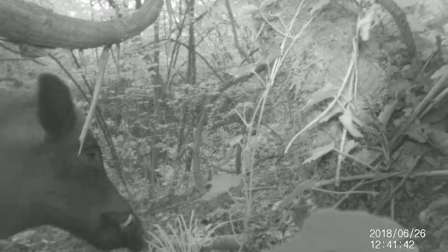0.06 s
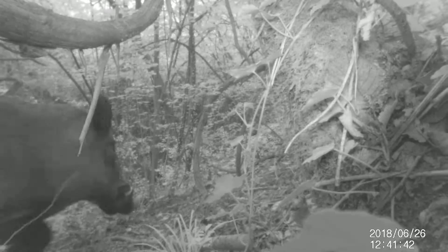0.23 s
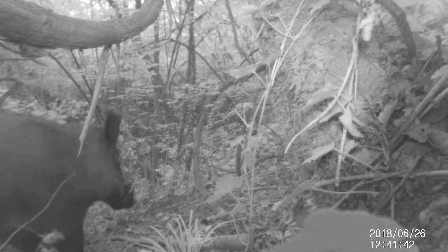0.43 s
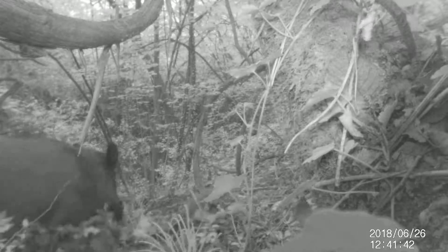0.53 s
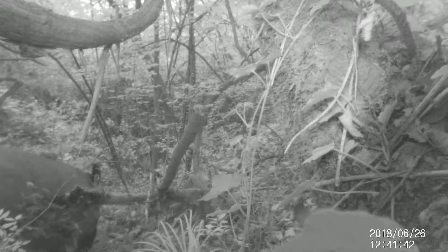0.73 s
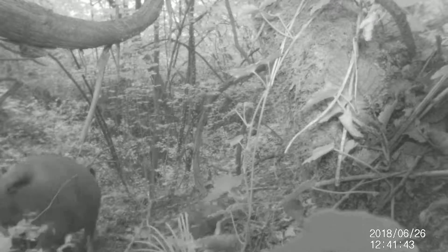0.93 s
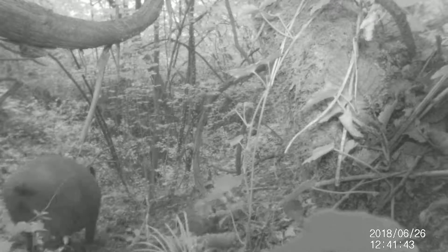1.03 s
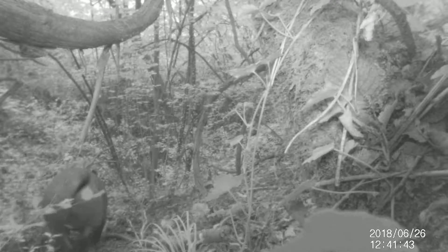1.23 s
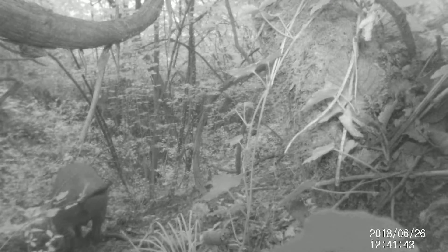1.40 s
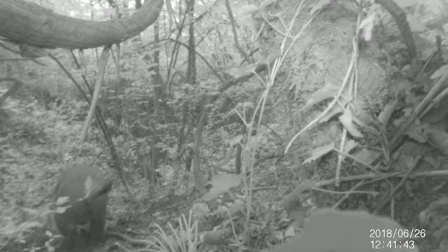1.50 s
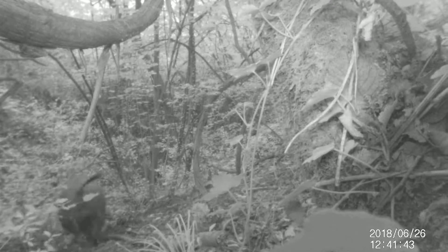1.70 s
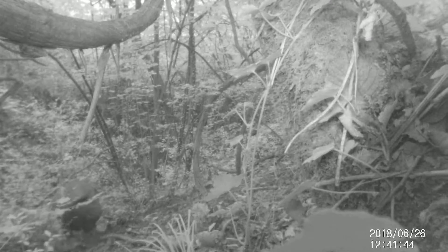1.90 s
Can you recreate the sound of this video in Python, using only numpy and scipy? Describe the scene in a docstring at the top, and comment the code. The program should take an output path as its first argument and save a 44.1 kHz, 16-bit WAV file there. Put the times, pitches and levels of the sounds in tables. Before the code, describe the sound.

Crackly rustling of a wild boar moving through forest undergrowth, heard close on a small, slightly dull microphone. One sharp stick snap comes early, followed by ticking twigs and low hoof thumps, before the animal moves off.

```python
"""Leaves crackle and swish as a wild boar pushes through forest undergrowth, close past and away.
Its body brushes the foliage, twigs tick, one dry stick snaps fibre by fibre, and hooves thud on
soft ground. Ticks and snap echo faintly from trunks and bank, over the hush of the forest.
A trail camera's small microphone dulls everything above about 6 kHz and overloads on the snap."""
import sys
import numpy as np
from scipy import signal
from scipy.fft import rfft, irfft
from scipy.io import wavfile

SR = 44100
rng = np.random.default_rng(int(sys.argv[2]) if len(sys.argv) > 2 else 0)


def put_to_file(sound):
    """Save the sound as 16-bit audio at rate SR, in the file named by the first command-line argument."""
    columns = np.atleast_2d(sound).T  # one column per channel
    safe = np.clip(columns, -1, 1)
    whole_steps = np.round(safe * 32767)
    wavfile.write(sys.argv[1], SR, whole_steps.astype(np.int16))


N = 85995
TIME = np.arange(N) / SR

# bright tone of dry leaves: f/Hz, relative level/dB
LEAF_SPECTRUM = [(100, -34), (350, -12.5), (520, -12.5), (800, -19.5), (1050, -11), (1400, -14),
                 (2200, -4.5), (3200, -1), (4200, -1.5), (4800, 1), (5500, -2.5), (6000, -14.5)]
# hollow tone of breaking wood: f/Hz, relative level/dB
WOOD_SPECTRUM = [(100, -21), (350, -3), (750, -15), (1150, -12), (1650, -3), (2300, -2.5), (3500, -9.5),
                 (6000, -38.5)]


def leaf_rustle(crackles_per_s=4000, spread_db=3, hiss_share=0.5, flutter_db=1.35):
    """The body brushes leaves: tiny crackles over a rubbing hiss; trodden litter adds a low scuff."""
    # swells of the body against the leaves: t/s, level/dB
    swells = [(0, -39.5), (.06, -46.5), (.12, -43.5), (.17, -47), (.225, -32.5), (.28, -32), (.39, -33),
              (.44, -35), (.54, -36.5), (.628, -42), (.652, -33.5), (.685, -34.5), (.74, -34.5),
              (.775, -31), (.83, -36), (.9, -41.5), (.945, -40), (.99, -45), (1.045, -43.5), (1.068, -36.5),
              (1.115, -45), (1.21, -48.5), (1.39, -44), (1.43, -49.5), (1.76, -52), (1.81, -46),
              (1.835, -42), (1.87, -42), (1.92, -49.5), (1.95, -53)]
    # dull tone of trodden litter: f/Hz, relative level/dB
    litter_spectrum = [(25, -12), (70, 3), (120, -5.5), (200, 1.5), (340, -0.5), (500, -9), (750, -17),
                       (2000, -36)]
    level_db = np.interp(TIME, *np.transpose(swells))
    sizes = amp(spread_db * np.minimum(rng.exponential(1, N), 5))
    crackles = sizes * rng.choice([-1, 1], N) * (rng.random(N) < crackles_per_s / SR)
    rub = np.sqrt(1 - hiss_share) * unit(crackles) + np.sqrt(hiss_share) * rng.standard_normal(N)
    leaves = colour(rub * amp(level_db + flutter_db * wander(rate_hz=68)), LEAF_SPECTRUM)
    treble = signal.filtfilt(*signal.butter(2, 4000, "high", fs=SR), leaves)
    leaves += treble * (amp(3 * TIME / TIME[-1]) - 1)  # 3 dB more treble as the boar moves off
    scuff_db = -47 + 0.75 * (level_db + 34)  # follows the swells, more gently
    return leaves + colour(rng.standard_normal(N), litter_spectrum) * amp(scuff_db)


def stick_snap(size=3000, ring_rise_s=0.00017, splinter_decay_s=0.00035, knock_rise_s=0.0015):
    """Fractures in quick succession splinter and ring the stick, which springs back with a knock."""
    # fibres giving way one after another: t/s, ring level/dB, splinter level/dB
    fractures = [(0.3653, -4, 0.5), (.3670, 0.5, -12), (.3681, -14.5, -0.5), (0.3696, 3.5, -10),
                 (.3710, -1, -9), (.3720, -22, -10.5)]
    # ringing modes of the stick: f/Hz, relative level/dB, t60/s
    modes = [(620, -26, .018), (930, -28, .012), (1400, -19, 0.018), (2170, -23.5, 0.013),
             (2610, -12.5, 0.0092), (4100, -6.5, 0.0097), (4710, 3, 0.0054), (5400, -7, .005)]
    rings, splinters, t = np.zeros(N), np.zeros(N), TIME[:size]
    for start, ring_db, splinter_db in fractures:
        detunes = 1 + .01 * rng.standard_normal(len(modes))
        ring = sum(amp(db - 60 * t / t60) * np.sin(2 * np.pi * hz * detune * t)
                   for (hz, db, t60), detune in zip(modes, detunes))
        add(rings, start, amp(ring_db - 1) * ring * (1 - np.exp(-t / ring_rise_s)))
        add(splinters, start, amp(splinter_db + 1) * noise_burst(splinter_decay_s, size))
    crack = rings + colour(splinters, WOOD_SPECTRUM)
    snap = signal.lfilter(*signal.butter(2, 443, "high", fs=SR), crack)
    swing = t / knock_rise_s * np.exp(1 - t / knock_rise_s)
    knock = -amp(-15.5) * swing * np.sin(2 * np.pi * 396.3 * t)
    add(snap, .367, knock)
    return snap


def twig_ticks():
    """Each twig gives one sharp tick and a quick crumble; thicker ones sound woodier."""
    # twigs and dry leaves breaking: t/s, level/dB, woody body offset/dB, crumble decay/s
    breaks = [(.0822, -37, -10, .0015), (.1042, -27.5, -16, 0.00038), (.2215, -27, -2, .002),
              (.2865, -25, -7, .002), (.5095, -31, -2, .002), (.564, -28, -11, .004),
              (.6085, -33.5, 5, .002), (0.6407, -23.5, 4, 0.003), (.6548, -26.5, -5.5, .002),
              (0.6711, -25.5, -11, 0.0024), (0.6746, -18, -3, 0.0016), (.6997, -28, -9, 0.00093),
              (.7575, -28, -6.5, .004), (.7925, -21.5, -3.5, 0.0012), (.9435, -34.5, -13, .001),
              (1.053, -35, -7, .001), (1.0642, -26, -2, .002), (1.332, -35, 0.5, .004),
              (1.828, -36, -8, 0.005)]
    bright, woody = np.zeros(N), np.zeros(N)
    for start, db, body_db, decay_s in breaks:
        crumble = noise_burst(decay_s, size=900)
        crumble[0] += .8  # the opening tick
        add(bright, start, amp(db + 16) * crumble)
        add(woody, start, amp(db + body_db + 7) * crumble)
    return colour(bright, LEAF_SPECTRUM) + colour(woody, WOOD_SPECTRUM)


def ground_thuds(size=2000, soil_t60=0.068):
    """A short low push into soft soil, followed by the crumbling of the ground around it."""
    # hooves and the stick's ends landing: t/s, level/dB, f/Hz, soil offset/dB, soil f/Hz
    landings = [(.095, -43.5, 90, -2, 130), (0.299, -33.5, 350, -4.5, 250), (.373, -29.5, 420, -4.5, 330),
                (.379, -31, 125, -8, 150), (0.53, -35, 118, -9, 250), (0.5641, -23, 120, -6, 190),
                (0.5783, -28.5, 140, -8.5, 200), (.618, -41, 80, -2, 230), (.6505, -34, 260, -2, 120),
                (0.765, -39, 95, -8, 200), (.785, -35, 230, -1, 330), (0.8275, -18, 235, -8.5, 375),
                (.8328, -24, 175, -3, 190), (1.063, -39.5, 230, -3, 280), (1.865, -44, 240, 0.5, 280)]
    thuds, t = np.zeros(N), TIME[:size] - TIME[size // 2]
    for centre, db, hz, soil_db, soil_hz in landings:
        blow = pressure_pulse(t, hz)
        soil = signal.fftconvolve(pressure_pulse(t, soil_hz), diffuse_tail(soil_t60))
        soil *= np.linalg.norm(blow) / np.linalg.norm(soil)
        add(thuds, centre + t[0], amp(db) * blow)
        add(thuds, centre + t[0] + .5 / hz, amp(db + soil_db) * soil)  # half a cycle later
    return thuds


def trunk_echo(sound, level_db=-14.5, t60=.16):
    """Trunks and bank scatter a sharp sound into a faint, short tail."""
    return amp(level_db) * signal.fftconvolve(sound, diffuse_tail(t60))[:N]


def forest_hush(level_db=-50):
    """A steady bed of soft noise, weighted to the low end."""
    # tone of the quiet forest: f/Hz, relative level/dB
    hush_spectrum = [(20, -7.5), (45, -2.5), (110, -9.5), (200, -0.5), (400, -11.5), (750, -13.5),
                     (1300, -13.5), (3200, -11.5), (5000, -11), (6000, -16)]
    return amp(level_db) * colour(rng.standard_normal(N), hush_spectrum)


def pressure_pulse(t, hz):
    """One smooth push centred on t = 0, its spectrum broad around hz."""
    u = (np.pi * hz * t) ** 2
    return (1 - 2 * u) * np.exp(-u)


def noise_burst(decay_s, size):
    """Noise of unit energy that falls to 1/e in decay_s."""
    burst = rng.standard_normal(size) * np.exp(-TIME[:size] / decay_s)
    return burst / np.linalg.norm(burst)


def diffuse_tail(t60):
    """A noise tail that dies by 60 dB in t60 seconds."""
    return noise_burst(t60 / np.log(1000), size=12000)


def wander(rate_hz):
    """Smooth random motion of rms 1, rolling off above rate_hz."""
    rolloff = np.exp(-(np.fft.rfftfreq(N, 1 / SR) / rate_hz) ** 2)
    return unit(irfft(rfft(rng.standard_normal(N)) * rolloff, N))


def colour(x, spectrum, size=2048):
    """Shapes the tone with a minimum-phase filter of unit energy, keeping attacks sharp."""
    hz, db = np.transpose(spectrum)
    f = abs(np.fft.fftfreq(size, 1 / SR))
    log_gain = np.log(amp(np.interp(np.log(f + 1), np.log(hz + 1), db)))
    response = np.exp(np.conj(signal.hilbert(log_gain)))
    taps = np.fft.ifft(response).real[:size // 2]
    return signal.fftconvolve(x, taps / np.linalg.norm(taps))[:len(x)]


def amp(db):
    """Decibels to gain."""
    return 10 ** (np.asarray(db) / 20)


def unit(x):
    """Scales to rms 1."""
    return x / np.sqrt(np.mean(x ** 2) + 1e-20)


def add(mix, start_s, sound):
    """Mixes a sound in at start_s."""
    part = mix[max(round(start_s * SR), 0):][:len(sound)]
    part += sound[:len(part)]


def scene():
    """Rustle, breaking wood and thuds over the hush, in mono; only the breaks echo."""
    breaks = twig_ticks() + stick_snap()
    forest = trunk_echo(breaks) + forest_hush()
    return (leaf_rustle() + breaks + ground_thuds() + forest)[None]


def record(dry, mic_edge_hz=5850, bias=.01, overload=.72, band_edge_hz=16500):
    """A narrow-band microphone, a slightly off-centre input that clips hard, then a final low-pass."""
    mic_filter = signal.firwin(161, mic_edge_hz, window=("kaiser", 7), fs=SR)
    band_filter = signal.firwin(511, band_edge_hz, window=("kaiser", 9), fs=SR)
    heard = signal.oaconvolve(dry, mic_filter[None], "same")
    clipped = np.clip(heard + bias, -overload, overload)
    return signal.oaconvolve(clipped, band_filter[None], "same")


dry = scene()
out = record(dry)
put_to_file(out)
```